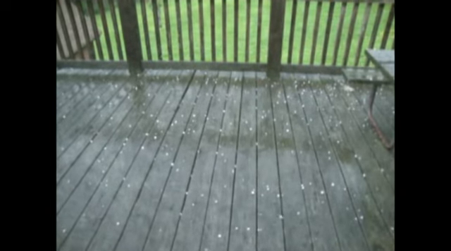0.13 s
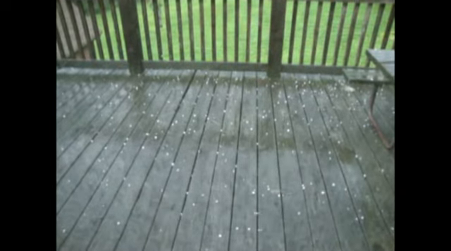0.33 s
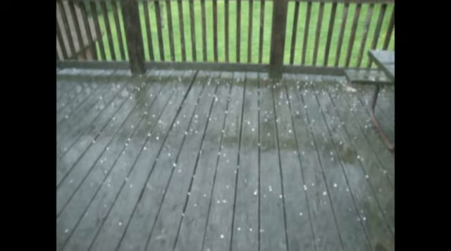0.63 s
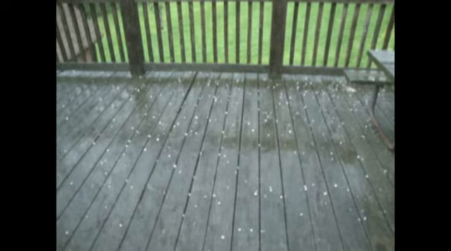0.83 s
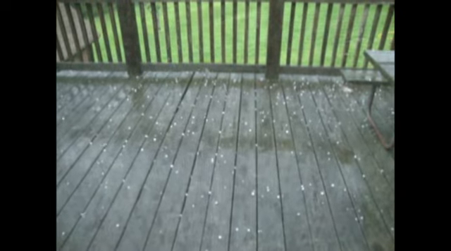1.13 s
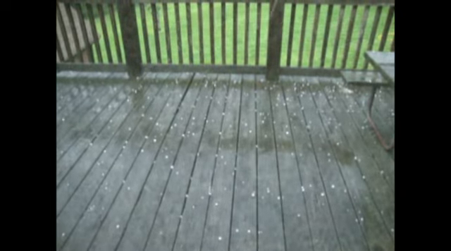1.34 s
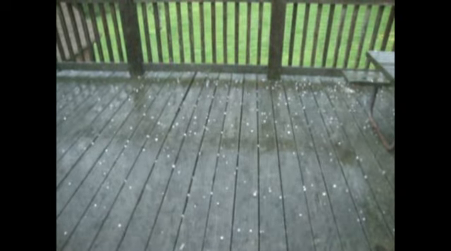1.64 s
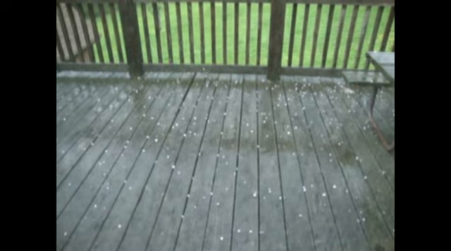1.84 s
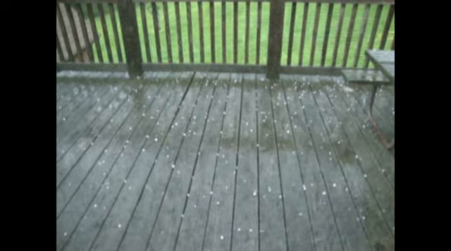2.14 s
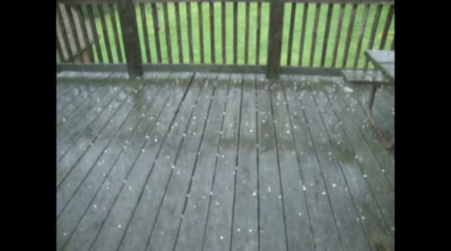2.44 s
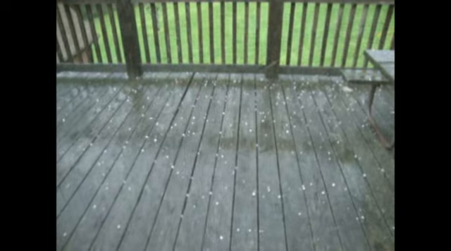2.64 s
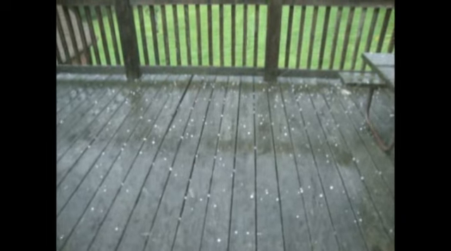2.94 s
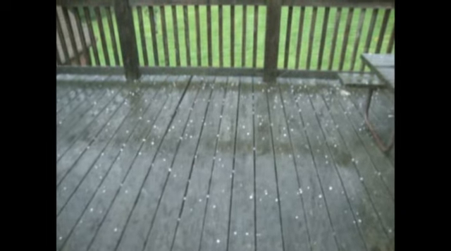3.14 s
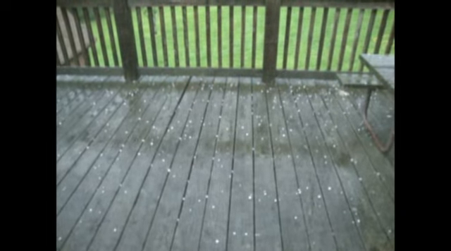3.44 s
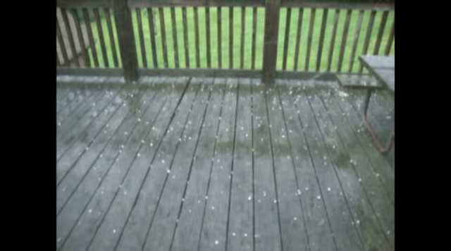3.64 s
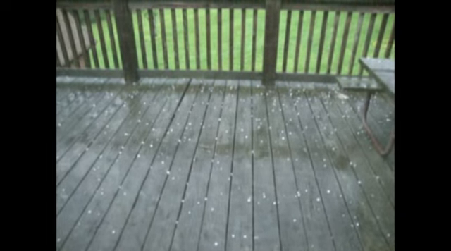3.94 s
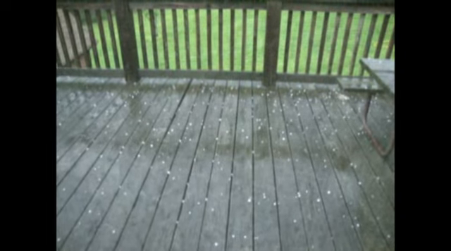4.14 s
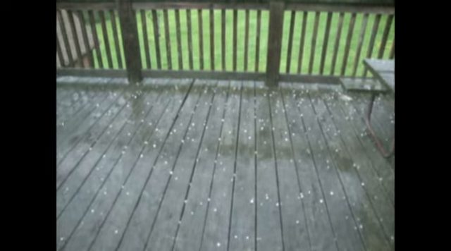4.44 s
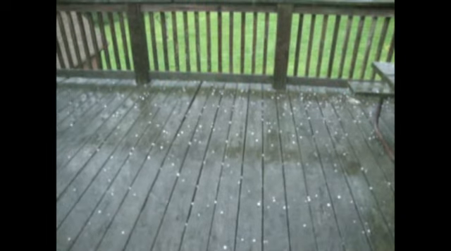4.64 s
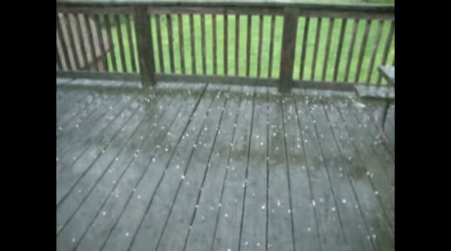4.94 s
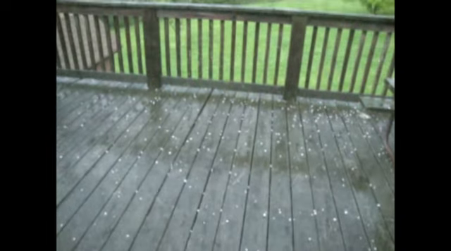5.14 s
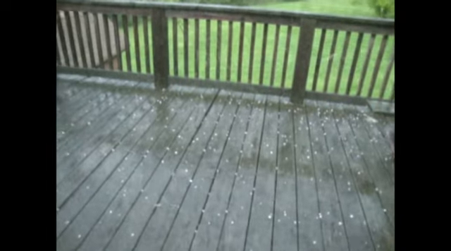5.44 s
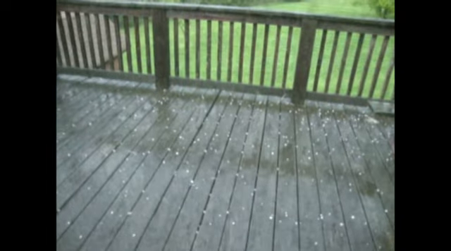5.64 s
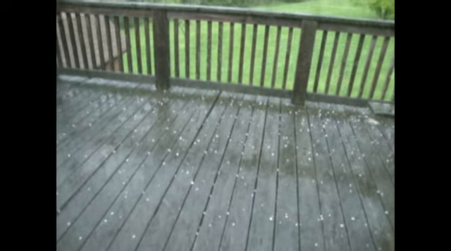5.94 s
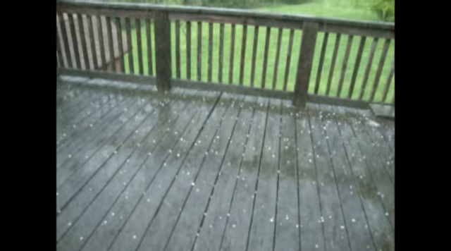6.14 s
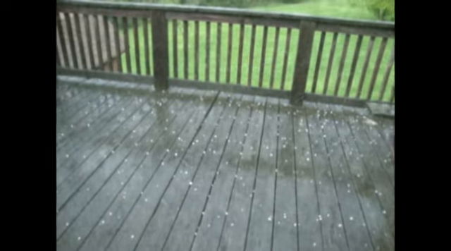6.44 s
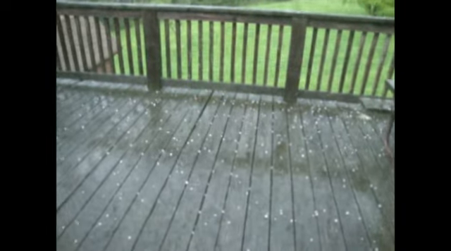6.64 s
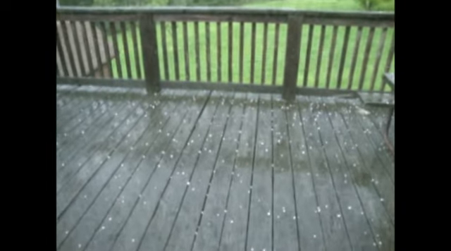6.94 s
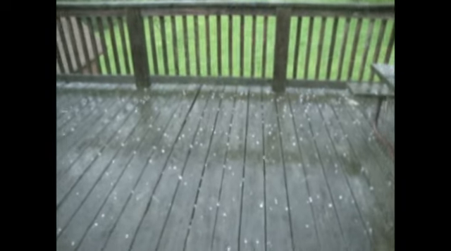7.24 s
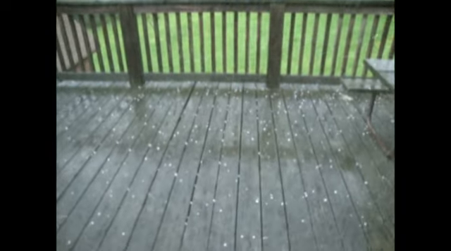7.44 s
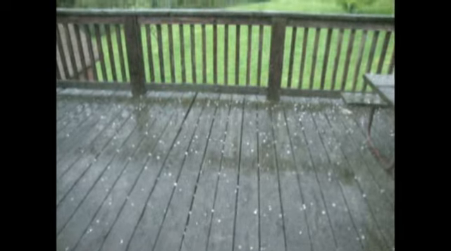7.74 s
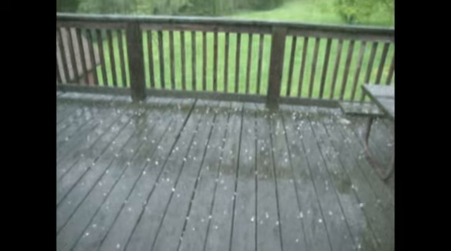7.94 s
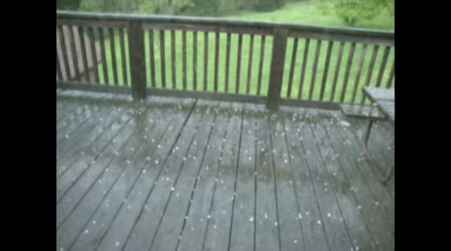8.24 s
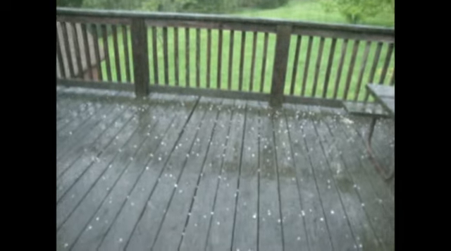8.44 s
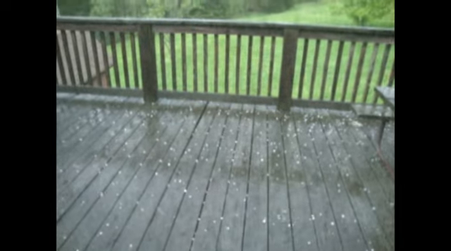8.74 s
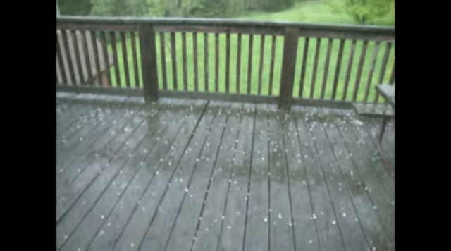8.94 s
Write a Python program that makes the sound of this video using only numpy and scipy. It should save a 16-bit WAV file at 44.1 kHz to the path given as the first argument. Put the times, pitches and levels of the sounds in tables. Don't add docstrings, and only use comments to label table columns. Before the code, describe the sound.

For about nine seconds, small hail and rain fall steadily on a wet wooden deck. From the start, sharp dry ticks and brittle cracks burst close to the microphone, crowded and irregular through the first 1.6 seconds. From about 1.7 to 2.5 seconds the close cracks thin, leaving woody knocks and softer clicks. Strong snaps return around 2.6 and cluster from 3 to 3.8 seconds, then hits continue unevenly, with bright cracks near 5.05, 5.7, 6.4 to 6.5, 7 and 7.8. Between them, tiny chips tick, puddle hits spit and hollow boards knock briefly. Faint metal table pings ring on now and then, more often near the end. Underneath runs a quiet grainy hiss of distant patter, with barely audible low drumming, strongest after 7.7 seconds. Outdoor, short scattered reflections, limited top end; the shower simply continues to the end.

```python
import sys
import numpy as np
from scipy import signal
from scipy.fft import rfft, irfft
from scipy.io import wavfile
from scipy.ndimage import uniform_filter1d, minimum_filter1d

SR = 44100
rng = np.random.default_rng(int(sys.argv[2]) if len(sys.argv) > 2 else 0)


def volts_from_db(level):
    exponent = np.asarray(level, float) / 20
    return 10 ** exponent


def waveform_to_disk(signal):
    frames = np.transpose(np.atleast_2d(signal))
    scaled = np.clip(frames, -1, 1) * 32767
    samples = np.round(scaled).astype(np.int16)
    wavfile.write(sys.argv[1], SR, samples)


N = 400869
SIZE = 8192
TOP_HZ = 10150


def unit(x):
    return x / np.sqrt(np.mean(x ** 2, axis=-1, keepdims=True))


def colour(x, spectrum, lo_hz=0, hi_hz=SR, ping_hz=1000, ping_db=0):
    f = np.maximum(np.fft.rfftfreq(x.shape[-1], 1 / SR), 1)
    hz, db = np.transpose(spectrum)
    response_db = np.interp(np.log(f), np.log(hz), db)
    edges = 1 / np.sqrt((1 + (lo_hz / f) ** 6) * (1 + (f / hi_hz) ** 6))
    hump_db = ping_db * np.exp(-(np.log(f / ping_hz) / 0.11) ** 2)
    return irfft(rfft(x) * volts_from_db(response_db + hump_db) * edges, x.shape[-1])


def walk(rate):
    k = int(SR / rate)
    steps = np.repeat(rng.standard_normal(N // k + 1), k)
    return 2.9 * uniform_filter1d(uniform_filter1d(steps, k), k)[:N]


def add(out, s, sound):
    i = max(int(s * SR), 0)
    out[i:i + len(sound)] += sound[:len(out) - i]


def far_patter():
    # start_s, level_db
    shower = [(0.0, -22.5), (0.28, -29), (0.68, -30), (1.11, -29.5), (1.8, -32.5), (2.51, -28.5),
              (2.71, -32), (3.24, -32), (3.64, -31.5), (4.1, -29), (4.43, -31.5), (5.52, -28.5),
              (6.05, -34.5), (6.38, -25.5), (6.91, -35.5), (7.32, -27.5), (8.94, -29), (9.09, -27.5)]
    # frequency_hz, density_db
    patter = [(24, -60), (40, -39), (171, -10.5), (670, 4.5), (1110, 6), (4450, 4.5), (8710, -3),
              (10000, -7.5), (13000, -99), (22000, -120)]
    falls_per_s, bands = 500, 11
    spread_db, t60_s, tick_db = 4.0, 0.092, 16
    out = 0
    t = np.arange(SIZE) / SR
    for hz in np.geomspace(350, 8500, bands):
        when, size = rng.random((6000, 2)).T
        hits = np.zeros(N)
        fall = (np.cumsum(-np.log(when)) * bands / falls_per_s * SR).astype(int)
        inside = fall < N
        np.add.at(hits, fall[inside], volts_from_db(np.minimum(-spread_db * np.log(size[inside]), 8)))
        echo = rng.standard_normal(SIZE) * volts_from_db(-60 * t / t60_s)
        echo[SIZE // 64] += volts_from_db(tick_db)
        grain = colour(echo, patter, hz / 1.6, hz * 1.6)
        out = out + signal.fftconvolve(hits, grain)[:N]
    flat = rfft(out)
    flat = flat / np.sqrt(uniform_filter1d(np.abs(flat) ** 2, 2000) + 1e-9)
    bed = unit(colour(irfft(flat, N), patter, 270))
    level_db = np.interp(np.arange(N) / SR, *np.transpose(shower))
    flicker_db = .25 * walk(9.4)
    return bed * volts_from_db(level_db - 1.13 + flicker_db)


def drumming_boards():
    # start_s, level_db
    gusts = [
        (0.0, -62),
        (1.59, -70),
        (2.35, -63),
        (3.92, -69.5),
        (4.45, -59.5),
        (6.43, -61),
        (6.71, -67),
        (7.74, -58),
        (9.09, -58.5),
    ]
    # frequency_hz, density_db
    rumble = [(15, -54), (25, -26.5), (102, -13.5), (227, -1.5), (300, 1), (390, -20.5), (660, -120)]
    level_db = np.interp(np.arange(N) / SR, *np.transpose(gusts))
    return unit(colour(rng.standard_normal(N), rumble)) * volts_from_db(level_db + 3.5 + 0.63 * walk(12))


def tick(hz, cycles):
    turns = np.arange(SIZE) / SR * hz
    x = np.sin(2 * np.pi * turns) * turns * np.exp(-turns / cycles)
    x = np.diff(x, prepend=0)
    return x / np.max(np.abs(x))


def knock(hz, t60, rise_s):
    t = np.arange(SIZE) / SR
    return np.sin(2 * np.pi * hz * t) * (1 - np.exp(-t / rise_s)) * volts_from_db(-60 * t / t60)


def tail(lo_hz, hi_hz, t60, ping_hz):
    # frequency_hz, density_db
    deck = [(24, -52), (40, -47), (124, -24), (583, 1.5), (1310, 0), (2330, -1.5), (4670, 5), (8710, -1),
            (10000, -4), (13000, -99), (22000, -120)]
    lumpy_db, early, early_s, swell_s = 5.5, 1.02, 0.0042, 0.0073
    t = np.arange(SIZE) / SR
    lumps = volts_from_db(lumpy_db * np.repeat(rng.uniform(-1, 1, SIZE // 128), 128))
    gathering = early * np.exp(-t / early_s) + 1 - np.exp(-t / swell_s)
    shape = lumps * gathering * volts_from_db(-60 * t / t60)
    x = colour(rng.standard_normal(SIZE) * shape, deck, lo_hz, hi_hz, ping_hz, ping_db=6)
    return x / np.std(x[:1024])


def near_stones():
    # start_s, tick_db (peak), pitch_hz, echo_db
    damp_board_stones = [
        (0, -16, 3500, -24),
                         (0.053, -5, 5840, -25.5), (0.1491, -19, 1910, -23.5), (0.2357, -20, 2140, -21),
                   (0.301, -21, 1940, -24), (0.4307, -64, 3600, -24), (0.605, -20, 4020, -20.5),
                   (0.88, -5, 4200, -31), (1.0388, -20, 3550, -25), (1.422, -14, 2920, -26),
                   (1.495, -23, 2650, -24.5), (1.5873, -4, 4220, -26.5), (1.8628, -10, 2390, -20),
                   (2.5887, -5, 3700, -21), (2.8796, -7, 5600, -23), (2.9855, -7.5, 4540, -25),
                   (3.0366, -8, 2220, -20.5), (4.058, -31, 1810, -23.5), (4.411, 5, 5250, -26),
                   (4.5163, -18, 5400, -24.5), (4.878, -17, 5080, -21.5), (5.4907, -16, 2550, -23.5),
                   (5.691, -4.5, 4820, -18.5), (6.2347, -12, 3720, -22), (6.431, -11, 5730, -22),
                   (6.6081, -33, 4020, -21.5), (6.9583, -5, 4680, -24.5), (7.236, -3, 4720, -22.5),
                   (7.3913, -9, 3700, -29), (7.803, -25, 3880, -24.5), (8.374, -11, 4600, -25.5)]
    # start_s, tick_db (peak), pitch_hz, echo_db
    dry_stones = [(0.3138, -17, 1980, -21), (0.3569, -33, 1650, -19), (0.5326, -2, 3970, -41),
                  (0.7997, -11, 4170, -30), (0.9999, -27, 4580, -24), (1.16, -8, 4530, -25),
                  (1.473, -16, 2680, -32), (1.726, -23, 3120, -31.5), (2.0224, -9.5, 1400, -26.5),
                  (2.8515, -33, 1240, -24), (3.0759, -55, 1910, -20.5), (3.2453, -20, 4140, -24.5),
                  (3.289, -5, 3700, -38), (3.4147, -12, 4430, -22), (3.6292, -12, 3680, -27.5),
                  (3.8747, -12, 5300, -21), (4.1709, -7, 4450, -26.5), (4.2382, -12, 4150, -35),
                  (4.3063, -4, 2300, -34), (4.6506, -17, 4780, -23), (4.6974, -3, 3640, -23),
                  (4.8445, -11, 2740, -28), (6.1801, -12, 1800, -21.5), (6.335, -1, 3650, -25.5),
                  (6.9275, -17, 3480, -21), (7.443, -19, 4000, -29), (7.7508, -17, 1830, -21),
                  (7.8233, -20, 4220, -44), (8.968, -30, 2160, -27), (9.0355, -6, 1530, -25)]
    # start_s, tick_db (peak), pitch_hz, splash_db
    puddle_stones = [(0.7041, 1, 2760, -31.5), (1.0624, -12, 1870, -29.5), (1.1954, -35, 5480, -21.5),
                     (1.2363, -32, 3500, -19), (1.6073, -7, 5300, -29), (1.7495, -37, 4500, -33.5),
                     (2.1074, -11, 3300, -33), (2.5137, -13, 3050, -25), (3.149, -10, 3040, -23),
                     (3.3, -7, 6700, -25.5), (3.49, -2, 3440, -26.5), (3.652, -26, 3680, -23),
                     (3.8318, -3, 4640, -27.5), (3.9392, -25, 1840, -26), (4.2837, -3, 4500, -27),
                     (5.0678, -13, 2520, -27), (5.1736, -21, 2670, -32), (5.1876, 2, 5000, -29),
                     (5.4179, -18, 5050, -26), (6.2606, -4, 4100, -24.5), (6.3834, 34, 4760, -35),
                     (6.4952, -7, 4540, -26), (6.5258, -17, 4570, -26.5), (6.8114, -22, 4800, -29.5),
                     (7.1376, -18, 6600, -25.5), (7.1694, -20, 4750, -27), (7.2783, -42, 4470, -31.5),
                     (8.1873, -20, 2870, -31.5), (8.4447, 6, 4280, -26), (8.8055, -9.5, 2000, -33)]
    # start_s, tick_db (peak), pitch_hz, thump_db
    hollow_stones = [(0.1026, -21, 2180, -33.5), (0.4781, -7, 2650, -35), (0.9132, -6, 4040, -31.5),
                     (1.9633, -16, 3400, -30.5), (2.0098, -23, 1390, -26.5), (2.185, -24, 2720, -28.5),
                     (2.2194, -6, 4800, -31.5), (2.3506, 1, 4660, -27), (2.4667, -13, 3200, -25),
                     (2.5576, -15, 2680, -22), (2.7547, -16, 2460, -33), (4.783, -32, 1300, -30.5),
                     (5.0191, -40, 4700, -53), (5.0501, -40, 4730, -53), (5.1288, -10, 3500, -31),
                     (5.3422, -5, 2650, -24.5), (5.548, -21, 1190, -23.5), (5.606, -11.5, 2580, -30.5),
                     (6.0803, -10, 4000, -29.5), (6.1636, -23, 1750, -31), (6.6998, -27, 3820, -26.5),
                     (7.081, -27, 1530, -27.5), (7.297, -18, 4200, -28.5), (7.5483, -15, 1790, -39),
                     (7.6052, -12, 1830, -29), (8.0648, -16, 1210, -27.5), (8.1305, -11, 1460, -29.5),
                     (8.3076, -1, 4150, -27.5), (8.6288, -10, 1780, -29.5), (8.7819, -18, 4120, -28)]
    # start_s, tick_db (peak), pitch_hz, echo_db
    more_damp_stones = [
        (4.9116, -20, 1680, -22),
        (5.3064, -14, 4020, -47),
        (5.8905, -6, 5800, -30.5),
        (7.8835, -7, 4320, -39),
        (8.9288, -25, 2700, -38),
        (9.0242, -23, 1330, -28),
    ]
    # start_s, pitch_hz, echo_db
    sleet = [(0.1336, 2830, -40), (0.8003, 1610, -35), (1.0381, 3770, -29), (1.13, 6030, -37),
             (1.369, 3900, -31.5), (1.5219, 5770, -27), (1.611, 5230, -34), (2.934, 1250, -29),
             (3.3503, 4300, -24), (3.7147, 4800, -31), (3.763, 5600, -29), (3.9829, 2830, -24.5),
             (4.4623, 4600, -36), (4.6943, 4000, -32), (4.8083, 1990, -23.5), (4.843, 2750, -26),
             (5.397, 5860, -39), (5.536, 2750, -24.5), (5.667, 6000, -39), (5.7638, 1500, -29),
             (5.8348, 1140, -31.5), (5.9955, 1260, -29), (6.0484, 2820, -28), (6.233, 4380, -24.5),
             (6.409, 3020, -25), (6.5457, 4600, -33), (6.8956, 1010, -34), (7.391, 3360, -42),
             (7.506, 4240, -27), (7.5498, 1810, -31), (7.949, 5070, -25), (8.0302, 4160, -30),
             (8.0509, 1060, -25.5), (8.4862, 1800, -27), (8.998, 5250, -26.5), (6.86, 3000, -30),
             (8.852, 5530, -32)]
    # low_hz, high_hz, t60_s, gain_db
    tails = [
        (240, 2240, 0.45, -11),
        (1390, 3540, 0.22, -7),
        (4910, 9000, 0.23, -9),
    ]
    # thump_db, echo_db, splash_db
    damp, dry_board, puddle, hollow = (-4, 1.6, 3.06), (-4.5, 2.3, -1.1), (-7.5, 0.82, 7.3), (3.8, 2.6, 3.9)
    sleet_tick_db, tick_gain_db, loudest_tick_db, scatter_db = -24, -2.5, -9.5, 1.2
    small_stones = [(s, sleet_tick_db, hz, db) for s, hz, db in sleet]
    surfaces = (
        (damp_board_stones, damp), (dry_stones, dry_board), (puddle_stones, puddle),
        (hollow_stones, hollow), (more_damp_stones, damp), (small_stones, dry_board))
    out = np.zeros(N)
    for stones, share_db in surfaces:
        for s, db, hz, strength_db in stones:
            tails_db = strength_db + np.array(share_db) + scatter_db * rng.standard_normal(size=3)
            thump_db, echo_db, _ = tails_db
            peak_db = min(db + tick_gain_db, loudest_tick_db)
            add(out, s + .0007, -volts_from_db(peak_db) * tick(hz, cycles=.4))
            add(out, s + .001, volts_from_db(echo_db - 1) * knock(hz, t60=.035, rise_s=.0005))
            low_mode = knock(rng.uniform(510.3, 1390), t60=0.17, rise_s=0.0017)
            add(out, s + 0.00079, volts_from_db(thump_db - 7.5) * low_mode)
            for d, (lo, hi, t60, gain_db) in zip(tails_db, tails):
                add(out, s + 0.001003, volts_from_db(d + gain_db) * tail(lo, hi, t60, hz))
    return out


def loose_slats():
    # start_s, pitch_hz, level_db
    rings = [(0.069, 5640, -24), (1.23, 3190, -19), (1.238, 3700, -19), (1.24, 4700, -15.5),
             (1.243, 1466, -20), (2.512, 4400, -29), (3.456, 1820, -23), (3.759, 2110, -27),
             (3.766, 4270, -23), (3.772, 3190, -19), (4.071, 1258, -23.5), (4.235, 4160, -19),
             (4.905, 1720, -31), (5.216, 5160, -25), (5.499, 2550, -32), (6.175, 1805, -24),
             (6.257, 1740, -20.5), (6.484, 1120, -22.5), (7.757, 1730, -21), (0.694, 1200, -20),
             (8.93, 2700, -29), (7.97, 927, -23), (8.075, 5100, -28), (9.037, 1477, -15.5)]
    out = np.zeros(N)
    for s, hz, db in rings:
        add(out, s, volts_from_db(db - 4.5) * knock(hz, t60=0.15, rise_s=0.0013))
        add(out, s, volts_from_db(db - 8.0) * knock(hz * 0.94, t60=0.11, rise_s=0.001))
    return out


def crack(hz):
    u = np.pi * hz * (np.arange(256) / SR - .001)
    return (2 * u ** 2 - 1) * np.exp(-u ** 2)


def doorstep():
    # start_s, level_db (peak), pitch_hz
    cracks = [(0.1039, -5.2, 2730.0), (0.1511, -7.8, 3960.0), (0.4328, -4.1, 3040.0),
              (0.6141, -4.1, 4300.0), (0.7048, -9.0, 4040.0), (0.8817, -7.3, 4240.0), (6.4106, -11, 4970.0),
              (1.4961, -9.0, 3720.0), (1.5916, -7.5, 4170.0), (2.5912, -4.8, 3710.0),
              (2.801, -13.6, 5650.0), (2.9868, -11.1, 4480.0), (3.1505, -6.2, 4570.0),
              (3.2464, -9.1, 3320.0), (3.3023, -6.5, 5090.0), (3.7179, -12.4, 5300.0),
              (5.0195, -11.6, 4720.0), (5.0514, -6.2, 4660.0), (5.693, -4.2, 3880.0),
              (6.3866, -7.5, 4500.0), (6.5268, -5.9, 4720.0), (6.5374, -9.9, 5280.0),
              (6.9289, -8.0, 4640.0), (6.9591, -7.1, 3010.0), (7.1717, -9.0, 3630.0),
              (7.2806, -9.2, 3550.0), (7.8042, -4.8, 3370.0), (7.8231, -8.4, 4990.0),
              (8.3775, -9.0, 3410.0)]
    # start_s, level_db (peak), pitch_hz
    more_cracks = [(0.3149, -5.2, 2090), (0.3595, -8.0, 2650), (0.7102, -12.0, 4030), (0.7151, -13.0, 3170),
                   (0.802, -12.8, 3940), (0.8071, -14.1, 1680), (0.9167, -11.8, 3790), (1.044, -11.6, 6180),
                   (1.1966, -10.1, 5230), (1.2187, -13.4, 7000), (1.266, -8.0, 5920), (1.7305, -14.7, 3210),
                   (2.0259, -11.4, 2540), (2.9468, -14.4, 4130), (2.9959, -13.1, 5210), (3.1582, -11.6, 6630),
                   (3.2888, -12.6, 3570), (3.3391, -13.1, 2780), (3.4165, -13.5, 4390), (3.8997, -11.6, 3060),
                   (4.0309, -14.5, 4800), (4.1661, -14.3, 5640), (4.4172, -12.4, 5430), (4.4655, -15.1, 5230),
                   (4.5256, -12.7, 1770), (4.6686, -13.3, 4290), (5.192, -11.5, 5320), (5.2475, -13.8, 5060),
                   (5.5639, -12.4, 6070), (5.6085, -14.0, 3750), (5.8484, -12.8, 6460), (5.9321, -13.7, 6550),
                   (6.0831, -13.7, 4740), (6.2181, -15.0, 5560), (6.4972, -11.6, 7000), (6.5622, -10.2, 5810),
                   (7.55, -12.6, 3620), (7.682, -13.9, 3420), (7.8426, -12.8, 6070), (8.4438, -13.0, 3120),
                   (8.4509, -12.0, 4840), (8.8208, -13.4, 5680), (8.9686, -13.0, 2560)]
    chips_per_s, chip_db, chip_spread_db = 30, -29, 3
    out = np.zeros(N)
    for s, db, hz in cracks + [(s, db + 1.5, hz) for s, db, hz in more_cracks]:
        add(out, s - .0011, volts_from_db(db + .3) * crack(hz))
    gap, size, pitch = rng.random((900, 3)).T
    starts_s = np.cumsum(-np.log(gap)) / chips_per_s
    sizes_db = np.minimum(-chip_spread_db * np.log(size), 9)
    for s, db, hz in zip(starts_s, sizes_db, 2200 * 2.6 ** pitch):
        if s * SR < N:
            add(out, s, volts_from_db(chip_db + db) * crack(hz))
    return out


def long_boards():
    # start_s, pitch_hz, level_db
    booms = [(0.125, 315, -39), (2.34, 260, -48), (2.384, 260, -35.5), (3.64, 330, -42), (5.42, 330, -39),
             (5.66, 280, -44), (6.27, 307, -44), (7.482, 330, -41), (8.14, 344, -40), (3.089, 302, -45),
             (8.931, 300, -44)]
    out = np.zeros(N)
    for s, hz, db in booms:
        add(out, s, volts_from_db(db) * knock(hz, t60=0.14, rise_s=0.0026))
    return out


def microphone_jolts():
    # start_s, level_db (peak)
    thuds = [
        (0.314, -47),
        (0.605, -53),
        (1.269, -57),
        (1.588, -49),
        (3.303, -59),
        (3.498, -56),
        (3.651, -55),
        (5.049, -58),
        (5.687, -48),
        (6.529, -56),
    ]
    t = np.arange(SIZE) / SR
    out = np.zeros(N)
    for s, db in thuds:
        add(out, s, volts_from_db(db + 23.5 - 60 * t / 0.002))
    return out


def metal_table():
    modes_hz = [994, 1299, 2555]
    decays_s = [1.2, 1.4, 1.05]
    # start_s, low_mode_db, middle_mode_db, high_mode_db
    strikes = [(0.361, -41, -32, -32), (0.799, -40, -36, -46), (1.85, -31, -50, -48), (2.47, -46, -36, -32),
               (3.039, -47, -44, -30), (4.06, -52, -41, -48), (4.78, -33, -29, -33), (5.337, -29, -50, -27),
               (5.495, -30.5, -43, -26), (5.609, -34, -39, -42), (6.335, -45, -27, -45),
               (7.648, -47, -26.5, -47), (7.98, -33, -34, -47), (8.439, -29.5, -55, -32),
               (8.798, -30, -50, -40), (8.97, -28, -46, -36)]
    t = np.arange(SR) / SR
    out = np.zeros(N)
    for s, *dbs in strikes:
        for db, hz, t60 in zip(dbs, modes_hz, decays_s):
            add(out, s, volts_from_db(db - 6.5 - 60 * t / t60) * np.sin(2 * np.pi * (hz * t + rng.random())))
    return out


def buzzing_spots():
    # start_s, pitch_hz, level_db
    snaps = [(7.4445, 4200, -20), (1.7255, 3200, -20), (4.3065, 2400, -17), (4.845, 2800, -16),
             (5.0196, 4900, -18), (5.0512, 4900, -18), (5.0722, 2600, -19), (6.2345, 4800, -19),
             (6.241, 4100, -16), (6.9592, 4900, -16), (8.929, 5900, -24), (8.9675, 2500, -18)]
    out = np.zeros(N)
    for s, hz, db in snaps:
        for ratio in (.91, 1, 1.1):
            add(out, s, volts_from_db(db) * knock(hz * ratio, t60=.024, rise_s=.0003))
    return out


def scene():
    light = near_stones() + loose_slats() + buzzing_spots()
    light = colour(light, [(20, -24), (140, -19), (330, 0), (SR, 0)])
    boards = drumming_boards() + light + long_boards() + microphone_jolts()
    return (far_patter() + boards + doorstep() + metal_table())[None]


def patchy_treble(x):
    # start_s, length_s, low_hz, high_hz
    treble_gaps = [(0.219, 0.015, 5300, 9000), (0.27, 0.029, 5300, 10400), (0.509, 0.02, 6100, 9000),
                   (0.572, 0.03, 6600, 10400), (0.685, 0.017, 6300, 9200), (0.742, 0.038, 5300, 9200),
                   (0.98, 0.017, 5600, 7300), (1.181, 0.013, 6500, 10400), (1.337, 0.019, 7700, 10400),
                   (1.4, 0.02, 5300, 10400), (1.567, 0.02, 8000, 10400), (1.734, 0.015, 6300, 10400),
                   (1.845, 0.017, 4600, 10400), (1.895, 0.026, 7300, 10400), (2.088, 0.017, 5800, 10400),
                   (2.161, 0.022, 5100, 9600), (2.779, 0.019, 5600, 10400), (3.064, 0.012, 5300, 10400),
                   (3.13, 0.017, 4700, 8900), (3.273, 0.015, 5300, 10400), (3.608, 0.02, 8200, 10400),
                   (3.637, 0.015, 7300, 10400), (3.804, 0.025, 4900, 10400), (3.92, 0.019, 6300, 8700),
                   (4.091, 0.028, 8400, 10400), (4.138, 0.026, 5300, 10400), (4.39, 0.017, 4400, 10400),
                   (4.497, 0.016, 4400, 8700), (4.606, 0.028, 6300, 10400), (4.674, 0.017, 8200, 9400),
                   (4.737, 0.025, 7700, 9400), (4.86, 0.016, 5300, 10400), (5.036, 0.013, 4400, 10400),
                   (5.054, 0.012, 4800, 10400), (5.081, 0.028, 5500, 6600), (5.326, 0.01, 6100, 10400),
                   (5.824, 0.019, 5100, 7000), (5.856, 0.033, 6100, 8700), (6.101, 0.019, 6800, 10400),
                   (6.199, 0.017, 5200, 10400), (6.351, 0.032, 5800, 10400), (6.579, 0.023, 5100, 8700),
                   (6.793, 0.017, 5400, 9600), (6.912, 0.015, 4400, 10400), (6.931, 0.007, 4800, 10400),
                   (7.786, 0.016, 5300, 8200), (7.902, 0.023, 4600, 9600), (8.173, 0.01, 5100, 9200),
                   (8.284, 0.013, 5100, 7800), (8.422, 0.019, 4400, 10400)]
    margin_db, slope_db, luck_db, drop_db = -35.0, -7.5, 5.5, -17
    hole_db, lull_db, patchy_db = -14, -1.5, 4
    f, t, z = signal.stft(x, SR, nperseg=512)
    loud = -minimum_filter1d(-np.sum(np.abs(z) ** 2, axis=0), size=6, origin=-2)
    edges = np.geomspace(4700, TOP_HZ + 300, 13)
    for lo, hi in zip(edges, edges[1:]):
        band = (f >= lo) & (f < hi)
        luck = np.repeat(rng.standard_normal(len(t)), 2)[:len(t)]
        limit_db = margin_db + slope_db * np.log2(lo / 6000) + luck_db * luck
        weak = np.mean(np.abs(z[band]) ** 2, axis=0) < loud * volts_from_db(2 * limit_db)
        z[band] *= np.where(weak, volts_from_db(drop_db), 1)
    thinned = signal.istft(z, SR, nperseg=512)[1]
    f, t, z = signal.stft(thinned, SR, nperseg=256)
    power = np.sum(np.abs(z) ** 2, axis=0)
    calm = power < 2 * uniform_filter1d(power, size=9)
    for lo, hi in zip(edges[::2], edges[2::2]):
        flutter_db = patchy_db * (np.repeat(rng.standard_normal(len(t)), 2)[:len(t)] - 1 / 3)
        z[(f >= lo) & (f < hi)] *= volts_from_db(calm * flutter_db)
    for s, length, lo, hi in treble_gaps:
        now = (t > s) & (t < s + length)
        z[:, now] *= volts_from_db(np.where((f > lo) & (f < hi), hole_db, lull_db))[:, None]
    return signal.istft(z, SR, nperseg=256)[1][:N]


def low_pass(x):
    return signal.sosfilt(signal.butter(12, 11260, fs=SR, output="sos"), x)


def record(dry):
    thin = patchy_treble(dry[0])
    cut = signal.sosfilt(signal.ellip(10, .2, 62, TOP_HZ, fs=SR, output="sos"), thin)
    return low_pass(cut[None])


dry = scene()
out = record(dry)
waveform_to_disk(out)
```